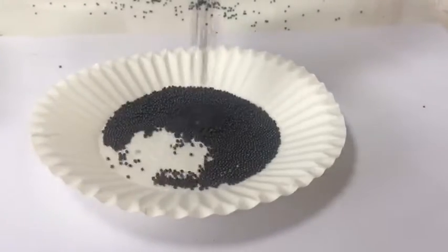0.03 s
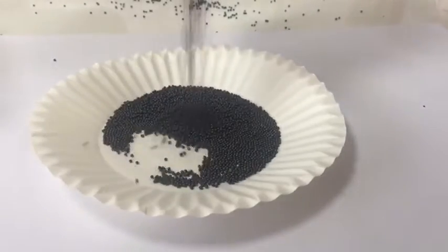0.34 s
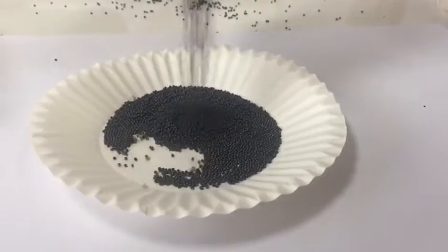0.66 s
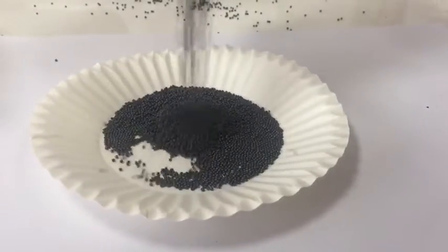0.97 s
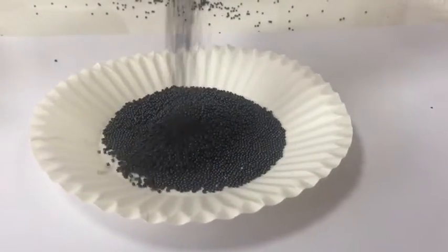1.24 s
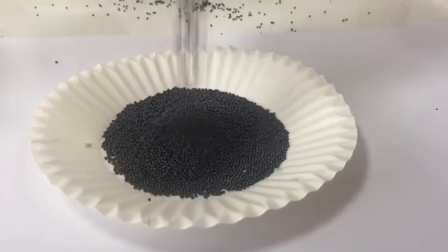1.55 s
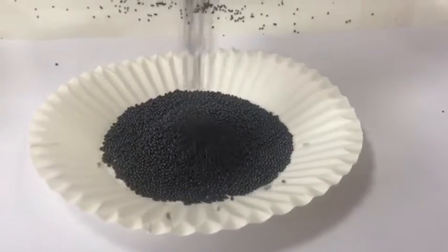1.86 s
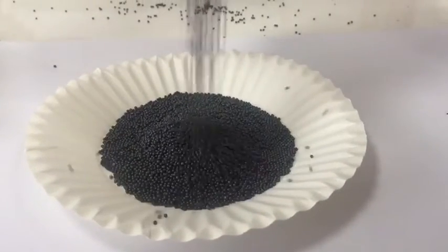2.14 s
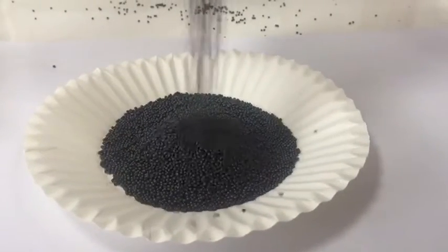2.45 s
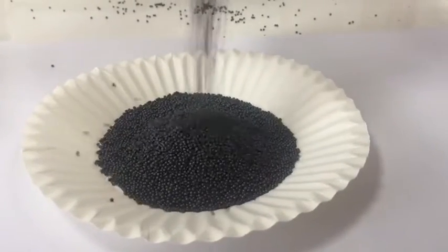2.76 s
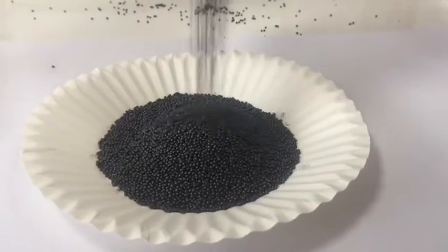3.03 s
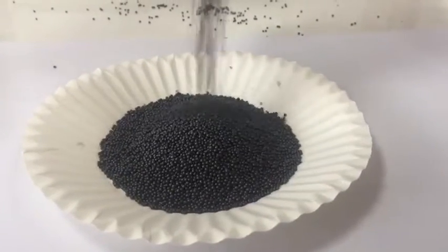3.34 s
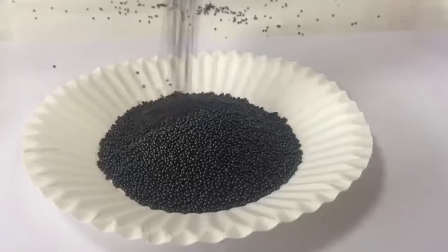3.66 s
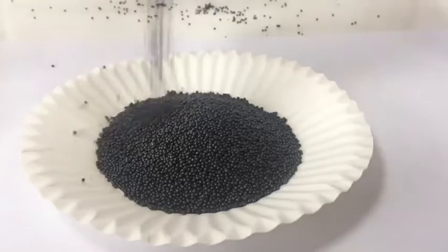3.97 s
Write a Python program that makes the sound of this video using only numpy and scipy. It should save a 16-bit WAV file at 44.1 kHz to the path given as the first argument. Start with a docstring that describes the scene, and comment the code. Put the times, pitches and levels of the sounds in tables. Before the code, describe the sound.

A stream of tiny metal beads hisses onto a paper plate, easing to a ticking trickle.

```python
"""Metal pellets poured onto a paper plate

A stream of small metal pellets drums on a paper plate in a small room. The growing heap muffles the
plate, low notes first, leaving the hiss of pellet on pellet, which thins to a trickle. Stray pellets
bounce off the heap and tap the bare paper rim. An appliance hums faintly behind."""
import sys
import numpy as np
from scipy import signal
from scipy.fft import rfft, irfft, next_fast_len
from scipy.io import wavfile
from scipy.ndimage import map_coordinates

SR = 44100
rng = np.random.default_rng(int(sys.argv[2]) if len(sys.argv) > 2 else 0)


def unload_wav(signal):
    """Save mono or channel-first audio to the path in sys.argv[1] as 16-bit WAV at rate SR, clipped to [-1, 1]."""
    wavfile.write(
        sys.argv[1],
        SR,
        np.round(np.clip(np.atleast_2d(signal).T, -1, 1) * 32767).astype(np.int16),
    )


N = 176400

# The bright tone of pellet hitting pellet. Each row: frequency in Hz, boost or cut in dB.
PELLET_TONE = [(600, -58.5), (1100, -35), (1500, -22.5), (1900, -15), (2900, -10), (3900, -8), (4900, -6),
               (5600, 0.5), (7000, 1), (8100, -1), (9300, 0.5), (10200, -2.5), (10700, -2.5), (11300, -1),
               (12000, -11.5)]


def plate():
    """The stream makes the plate's floor ring, until the heap muffles its notes one after another."""
    # The plate's notes. Each row: pitch in Hz, width in Hz, relative level in dB,
    # time in seconds when the muffling starts.
    notes = [(994, 570, -15, 0.016), (1237, 110, -10, 0.13), (1780, 300, -6.5, 0.016),
             (2080, 120, -3.5, 0.057), (2510, 220, -8.5, 0.52), (3170, 260, -3, 0.29), (4064, 310, 0, 0.43),
             (4610, 196, 1, 0.49), (5330, 285, 2.5, 0.55), (5740, 340, 3, 0.58), (6510, 610, 1.5, 0.5),
             (7820, 720, -3, 0.48), (9300, 1230, -4.5, 0.28), (11420, 380, -8, 0.33)]
    level_db, muffle_db_per_s = -25, 39.5
    moves_per_s, swing_db, pitch_swing = 30, 1.35, 0.01222  # the landing spot wanders
    blows = clicks(per_s=4500, spread_db=4, fade_s=0.00082)
    blows = low_cut(blows, hz=945.5, order=7)  # light paper gives off little bass
    bare, muffled = 0, 0
    for k, (hz, width_hz, db, buried_s) in enumerate(notes):
        note = signal.lfilter(*signal.iirpeak(hz, hz / width_hz, SR), blows)
        note *= (-1) ** k * amp(db + swing_db * wobble(moves_per_s))
        bare += note
        muffled += note * amp(-muffle_db_per_s * np.maximum(clock() - buried_s, 0))
    # Running time a little fast or slow bends the pitch.
    bent_time = clock() + pitch_swing / moves_per_s * wobble(moves_per_s)
    muffled = map_coordinates(muffled, [bent_time * SR], mode="mirror")
    return muffled / np.std(bare) * amp(level_db + 0.62 * wobble(60.6))


def rush():
    """The thick stream hits the heap: thousands of tiny clicks a second blur into a hiss."""
    # How loud the hiss is. Each row: time in seconds, level in dB.
    levels = [(0, -31), (.08, -27.5), (.2, -34.5), (.4, -29), (.52, -30), (.63, -26.5), (.72, -30),
              (.79, -30.5), (1, -30), (1.15, -26), (1.40, -28), (1.5, -35), (2.1, -45.5), (2.5, -52),
              (4, -40.5)]
    hiss = coloured(clicks(per_s=6500, spread_db=5.5, fade_s=0.0032), PELLET_TONE)
    return unit(hiss) * amp(over_time(levels) + 0.59 * wobble(50.3))


def trickle():
    """As the stream thins, single pellets tick out of it, and the tall heap softens the treble."""
    # How loud the trickle is. Each row: time in seconds, level in dB before the softening.
    levels = [(0, -49), (1.3, -41.5), (1.6, -37.5), (2, -35), (2.14, -32.5), (2.34, -37), (2.47, -35),
              (2.58, -37), (2.7, -35.5), (2.85, -39), (2.93, -38.5), (3, -35), (3.12, -38.5), (3.27, -37),
              (3.4, -41), (3.5, -44.5), (3.58, -44), (3.72, -36), (3.86, -39), (4, -46)]
    # The trickle's tone. Each row: frequency in Hz, boost or cut in dB.
    tone = [(600, -37), (1100, -55), (1500, -29), (1900, -1.5), (2800, -10), (3400, -4.5), (3900, 0.5),
            (4900, -1), (5700, 1.5), (6700, 0), (7600, -8), (8400, -3), (9200, 2.5), (10300, 0.5),
            (11200, -2), (12000, -7)]
    # Sharp ticks gain ground. Each row: time in seconds, their share of the power from 0 to 1.
    tick_shares = [(1.3, 0.18), (2.4, 0.36), (3.1, 0.43)]
    shower = clicks(per_s=1900 * np.exp(-0.33 * clock()), spread_db=2.0, fade_s=0.0051)
    at = arrivals(per_s=150)
    tick_db = 5 * np.minimum(rng.standard_normal(len(at)), 1)
    ticks = unit(contacts(at, tick_db, fade_s=0.0022))
    share = over_time(tick_shares)
    pellets = unit(coloured(np.sqrt(1 - share) * shower + np.sqrt(share) * ticks, tone))
    dull_from_s, dull_over_s, dull_above_hz, dull_db = 2.77, 0.24, 8350, -10
    treble = filtered(pellets, lambda hz: 1 - 1 / (1 + (hz / dull_above_hz) ** 20))
    dullness = np.clip((clock() - dull_from_s) / dull_over_s, 0, 1)
    pellets += treble * (amp(dull_db * dullness) - 1)
    return pellets * amp(over_time(levels) + 1.3 * wobble(45))


def snaps():
    """A few head-on hits between pellets stand out above the stream."""
    # The sharpest hits. Each row: start in seconds, relative level in dB.
    hits = [(.2057, -5), (0.63, -10), (0.6877, -7), (.8637, -9), (1.0056, -9), (1.3861, -10), (1.539, -13),
            (2.38, -22), (3.452, -19)]
    start_s, db = np.transpose(hits)
    return coloured(contacts(np.round(start_s * SR).astype(int), db, fade_s=0.002), PELLET_TONE)


def rim():
    """Stray pellets patter on the bare rim, with harder taps among them."""
    # How loud the patter is. Each row: time in seconds, level in dB.
    levels = [(0, -37), (.8, -47), (1.35, -44), (1.7, -42), (2.04, -42), (2.14, -34), (2.38, -45.5),
              (2.45, -37.5), (2.58, -50), (2.74, -35.5), (2.88, -41), (2.94, -56), (3.04, -44),
              (3.15, -47.5), (3.3, -42), (3.48, -51.5), (3.64, -46), (3.86, -37), (4, -42.5)]
    # A thicker stream scatters more strays. Each row: time in seconds, hits per second.
    rates = [(1.3, 600), (1.8, 150), (4, 140)]
    # The hardest taps. Each row: start in seconds, relative level in dB, boost or cut of the ring in dB.
    taps = [(1.5972, -12.5, -7.5), (1.7697, -12.5, -18), (1.8302, -14.5, -13), (1.8991, -13, -11),
            (1.9693, -17, -23), (2.1107, -14, -7), (2.1242, -11, -8), (2.21, -13, -12), (2.2398, -25, 5.5),
            (2.372, -14.5, -20), (2.4363, -14, -30), (2.457, -6, -17.5), (2.4767, -10, -37),
            (2.5152, -9, -12), (2.563, -15.5, -10), (2.624, -12, -32.5), (2.6282, -11.5, -20),
            (2.6555, -21, -1), (2.6912, -9.5, -16), (2.7065, -16, -9), (2.794, -14, -12),
            (2.8457, -19.5, -4.5), (2.8896, -26.5, -3), (2.9725, -20, -7.5), (2.9856, -14.5, -18),
            (3.031, -16, -7), (3.077, -13.5, -16), (3.0864, -22.5, -28.5), (3.1397, -13, -32),
            (3.1704, -11, -16), (3.2825, -17, -6.5), (3.3492, -15, -12), (3.3746, -8.5, -14),
            (3.382, -14, -9), (3.4429, -13, -10.5), (3.5202, -17.5, -3), (3.534, -19.5, -2),
            (3.6238, -13, -17), (3.7169, -16, -17), (3.7312, -15.5, -13), (3.7977, -10.5, -6),
            (3.8048, -19, -8), (3.8411, -12, -15), (3.8507, -15, -10), (3.935, -17, -10)]
    per_s = over_time(rates)
    at = arrivals(per_s)
    size, ring_size = np.minimum(rng.standard_normal((2, len(at))), 1)
    patter = rim_hits(at, db=3 * size, ring_db=2 * ring_size - 3)
    patter = unit(patter / np.sqrt(per_s)) * amp(over_time(levels))
    start_s, tap_db, ring_db = np.transpose(taps)
    return patter + rim_hits(np.round(start_s * SR).astype(int), tap_db - 4, ring_db)


def rim_hits(at, db, ring_db):
    """Each hit gives a crack and a short papery ring, pitched by where it lands and by the load."""
    # The crack's tone. Each row: frequency in Hz, boost or cut in dB.
    crack_tone = [(600, -47), (1100, -40), (1700, -12.5), (2400, -4), (3100, -6), (4000, -3.5),
                  (4900, -4.5), (5900, 0.5), (7700, -3), (9300, 1), (10400, -7), (11200, -3), (11900, -24)]
    # The rim's notes. Each row: pitch in Hz, relative level in dB, seconds to fade by 60 dB.
    notes = [(1702, -6, 0.01), (1975, -2.5, 0.01116), (2288, -3, 0.011)]
    hold_s, pitch_spread = 0.0005, 0.083
    sag_per_s, sag_from_s = 0.048, 2.754  # the growing load lowers the pitch
    t = np.arange(SR // 40) / SR
    after_hold = np.maximum(t - hold_s, 0)
    cracks = rng.choice([-1, 1], (len(at), len(t))) * fade(after_hold, fade_s=0.004)
    sag = sag_per_s * np.maximum(at[:, None] / SR - sag_from_s, 0)
    rings = 0
    for hz, note_db, fade_s in notes:
        spot, size, phase = rng.standard_normal((3, len(at), 1))
        pitch_hz = hz * np.exp(pitch_spread * spot - sag)
        wave = np.sin(2 * np.pi * (pitch_hz * t + phase))
        rings += amp(note_db + size) * fade(after_hold, fade_s) * wave
    strength = np.linalg.norm(rings, axis=1, keepdims=True)
    rings *= strength.mean() / strength  # make all rings equally strong first
    rings *= amp(ring_db)[:, None] * np.minimum(t / hold_s, 1)
    return coloured(place(cracks, at, db), crack_tone) + low_cut(place(rings, at, db), hz=1595, order=6)


def room(sound, pieces=50):
    """The echoes change as the landing spot wanders, so each piece of the sound gets its own."""
    out = np.zeros(N + SR)
    for piece in np.array_split(np.arange(N), pieces):
        echoed = signal.fftconvolve(sound[piece], echoes())
        out[piece[0]:piece[0] + len(echoed)] += echoed
    return out[:N]


def echoes():
    """Quick echoes come from the table and nearby things, then a short faint tail from the room."""
    # How long the room rings. Each row: frequency in Hz, seconds to fade by 60 dB.
    fade_times = [(300, 0.065), (2000, 0.22), (10000, 0.061)]
    near_db, tail_db = -9, -15
    hz, t, spectrum = signal.stft(rng.standard_normal(SR // 4), SR, nperseg=256)
    tail = signal.istft(spectrum * fade(t, over_pitch(fade_times, hz)[:, None]), SR)[1]
    t = np.arange(len(tail)) / SR
    near = rng.standard_normal(len(t)) * fade(t, fade_s=0.016) * (t > 0.0015)
    tail *= t > 0.005
    return amp(near_db) * near / np.linalg.norm(near) + amp(tail_db) * tail / np.linalg.norm(tail)


def appliance():
    """Mains power makes an unsteady hum; above it wavers a whir, wrapped in a narrow band of noise."""
    # The hum's tones. Each row: pitch in Hz, level in dB.
    hum_tones = [(65, -80), (100, -73.5), (119.8, -67.5)]
    # How loud the whir is. Each row: time in seconds, level in dB.
    whir_levels = [(0, -76), (.35, -62.5), (.55, -59.5), (.8, -68.5), (1, -60.5), (1.25, -66), (1.6, -61.5),
                   (2.25, -61), (2.7, -63.5), (2.95, -81), (3.15, -61.5), (3.55, -62), (3.9, -58.5)]
    whir_hz, band_width_hz, band_db = 275.2, 35, -66.5
    hum = 0
    for hz, db in [*hum_tones, (whir_hz, over_time(whir_levels))]:
        gain = amp(db + 0.87 * wobble(7.067))
        hum += gain * unit(np.sin(2 * np.pi * hz * clock() + 0.48 * wobble(5.85)))
    band = signal.lfilter(*signal.iirpeak(whir_hz, whir_hz / band_width_hz, SR), rng.standard_normal(N))
    return hum + amp(band_db) * unit(band)


def rumbles():
    """Two soft low rumbles rise quickly, hold a moment and die away."""
    # The rumbles. Each row: time of reaching full level in seconds, hold in seconds, level in dB.
    swells = [(0.135, 0.089, -58), (1.855, 0.14, -51.5)]
    # Their tone. Each row: frequency in Hz, boost or cut in dB.
    tone = [(30, -41), (65, -9), (110, -4), (165, 8.5), (230, -1), (400, -14), (900, -62)]
    rise_s, fall_db_per_s = 0.0186, 73
    gain = 0
    for full_s, hold_s, db in swells:
        t = clock() - full_s
        rise = np.clip(t / rise_s + 1, 0, 1)
        gain += rise * amp(db - fall_db_per_s * np.maximum(t - hold_s, 0))
    return gain * noise(tone)


def room_air():
    """The room's air hisses faintly over a deep drone that slowly grows."""
    # The tones of the air and of the drone. Each row: frequency in Hz, boost or cut in dB.
    air_tone = [(20, -17), (50, -15), (100, 2.5), (190, -3.5), (300, -8), (400, -19.5), (600, -15.5),
                (1000, -19.5), (4000, -19.5)]
    drone_tone = [(20, -15), (40, -6), (65, -2), (110, -32), (300, -39)]
    air_db, drone_db, rise_db_per_s = -58.5, -76, 3.5
    return amp(air_db) * noise(air_tone) + amp(drone_db + rise_db_per_s * clock()) * noise(drone_tone)


def clicks(per_s, spread_db, fade_s):
    """A shower of tiny hits, each a noise burst of its own size; the overall loudness stays even."""
    at = arrivals(per_s)
    sizes = amp(spread_db * np.minimum(rng.standard_normal(len(at)), 2))
    power = np.bincount(at, sizes ** 2, N) / per_s
    power = signal.lfilter([1], [1, -fade(1 / SR, fade_s) ** 2], power)  # each hit dies away
    return unit(np.sqrt(power) * rng.standard_normal(N))


def contacts(at, db, fade_s):
    """Metal strikes metal: a very short burst of noise at each given sample."""
    t = np.arange(SR // 200) / SR
    return place(rng.choice([-1, 1], (len(at), len(t))) * fade(t, fade_s), at, db)


def arrivals(per_s):
    """Sample numbers of scattered hits, about per_s of them a second."""
    count = np.cumsum(np.broadcast_to(per_s, N)) / SR
    hits = np.arange(int(count[-1]))
    return np.searchsorted(count, (hits + 2 * rng.standard_normal(len(hits))) % count[-1])


def place(waves, at, db):
    """Add short sounds into one track, each at its own start sample and level."""
    samples = at[:, None] + np.arange(waves.shape[1])
    return np.bincount(samples.ravel(), (amp(db)[:, None] * waves).ravel(), N)[:N]


def fade(t, fade_s):
    """A gain that falls by 60 dB every fade_s seconds."""
    return np.exp(-np.log(1000) * t / fade_s)


def amp(db):
    """Turn decibels into a gain."""
    return 10 ** (np.asarray(db) / 20)


def unit(x):
    """Scale a sound to an average (rms) level of 1."""
    return x / np.sqrt(np.mean(x ** 2) + 1e-20)


def clock():
    """The time of each sample in seconds."""
    return np.arange(N) / SR


def over_time(rows):
    """Join rows of time and value with straight lines, giving one value per sample."""
    return np.interp(clock(), *np.transpose(rows))


def over_pitch(rows, hz):
    """Read between rows of frequency and value, on a scale of octaves."""
    row_hz, values = np.transpose(rows)
    return np.interp(np.log(hz + 1), np.log(row_hz + 1), values)


def wobble(per_s):
    """A smooth curve through per_s random values a second."""
    values = rng.standard_normal(int(N * per_s / SR) + 4)
    return map_coordinates(values, [clock() * per_s], mode="nearest")


def noise(tone):
    """Steady noise with the given tone, at an average level of 1."""
    return unit(coloured(rng.standard_normal(N), tone))


def coloured(x, tone, size=8192):
    """Give a sound a tone, from rows of frequency in Hz and boost or cut in dB."""
    cepstrum = irfft(np.log(amp(over_pitch(tone, np.fft.rfftfreq(size, 1 / SR)))))
    # This folding makes the filter ring only after a hit, never before it.
    cepstrum[1:size // 2] *= 2
    cepstrum[size // 2 + 1:] = 0
    return signal.fftconvolve(x, irfft(np.exp(rfft(cepstrum))))[:N]


def filtered(x, gain_at):
    """Scale each frequency of a sound by gain_at(hz)."""
    size = next_fast_len(N + SR // 2)
    return irfft(rfft(x, size) * gain_at(np.fft.rfftfreq(size, 1 / SR)), size)[:N]


def low_cut(x, hz, order):
    """Turn down everything below hz; a higher order cuts more steeply."""
    return signal.sosfilt(signal.butter(order, hz, "highpass", fs=SR, output="sos"), x)


def scene():
    """The pour, its echoes and the quiet background, in one channel."""
    pour = plate() + rush() + trickle() + snaps() + rim()
    return (pour + room(pour) + appliance() + rumbles() + room_air())[None]


def record(dry):
    """Cut away the very highest treble."""
    top_hz = 11950
    return filtered(dry[0], lambda hz: 1 / np.sqrt(1 + (hz / top_hz) ** 300))[None]


dry = scene()
out = record(dry)
unload_wav(out)
```